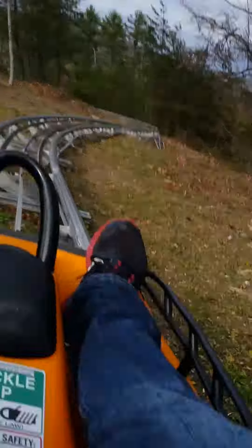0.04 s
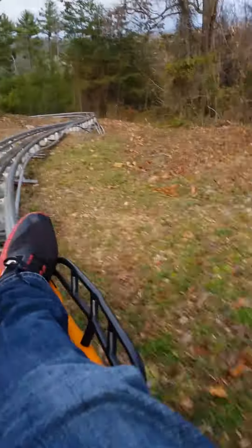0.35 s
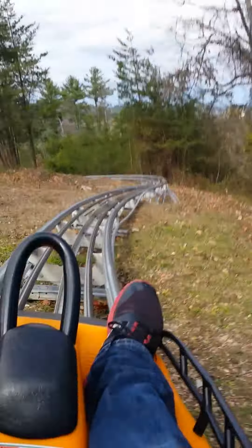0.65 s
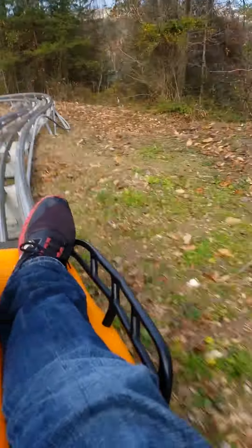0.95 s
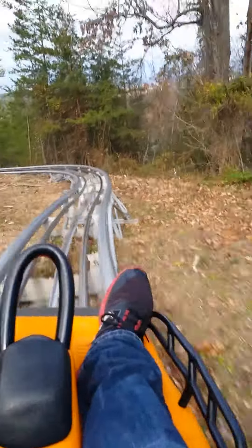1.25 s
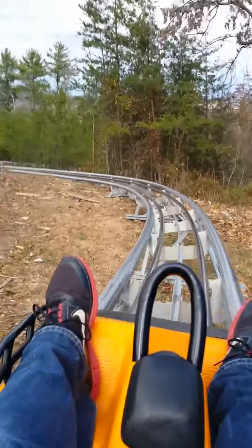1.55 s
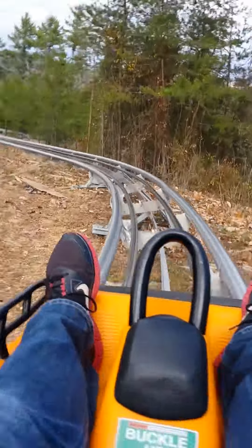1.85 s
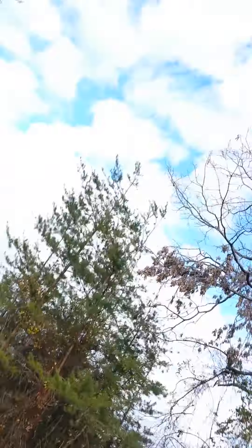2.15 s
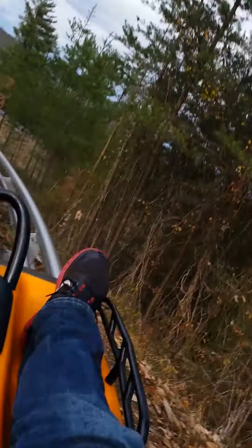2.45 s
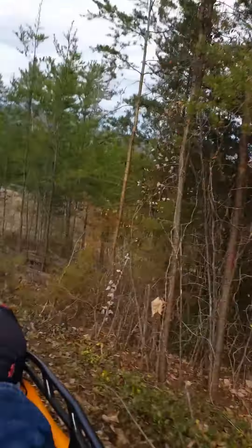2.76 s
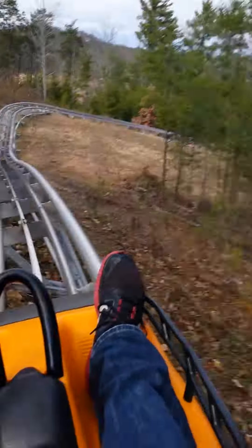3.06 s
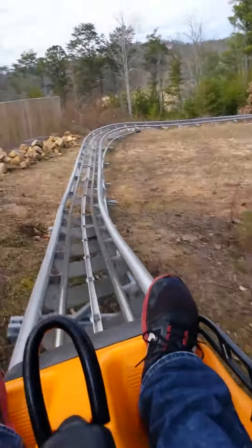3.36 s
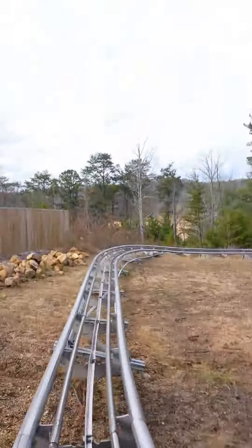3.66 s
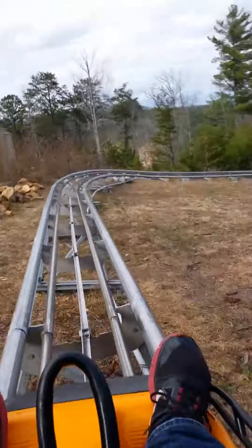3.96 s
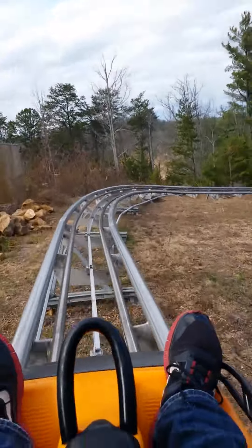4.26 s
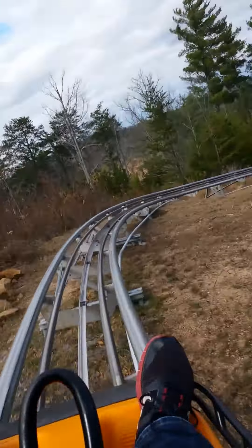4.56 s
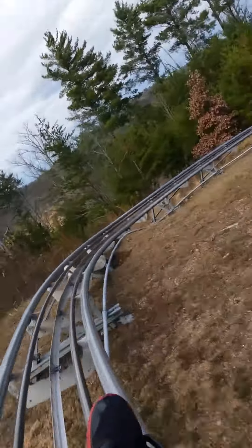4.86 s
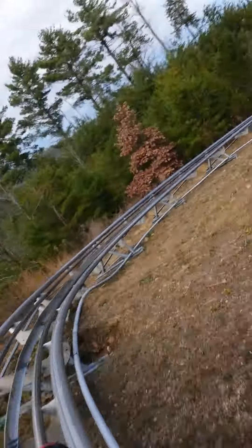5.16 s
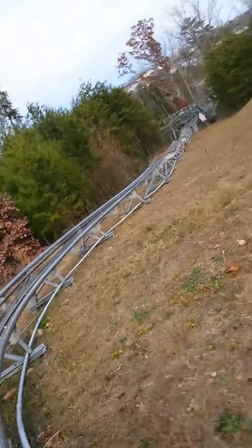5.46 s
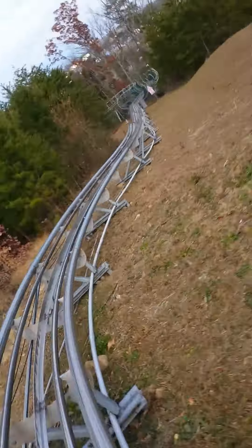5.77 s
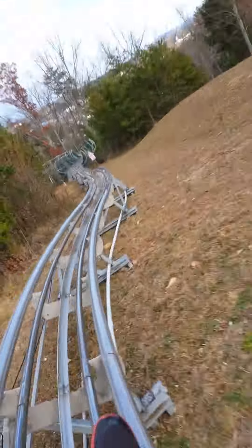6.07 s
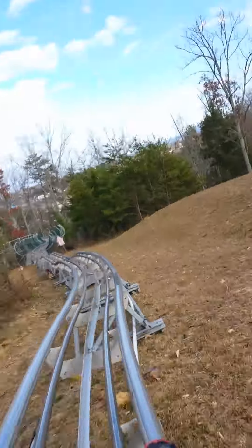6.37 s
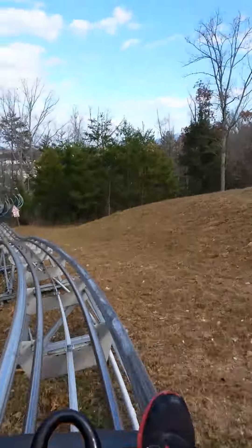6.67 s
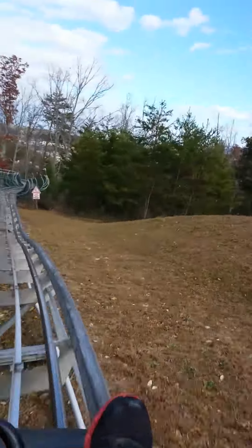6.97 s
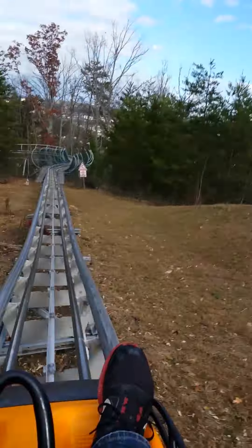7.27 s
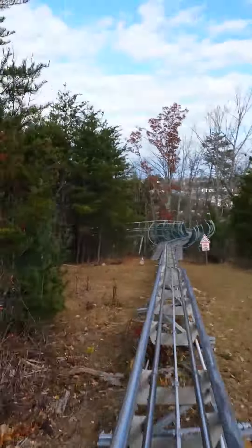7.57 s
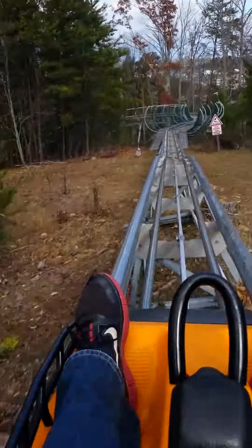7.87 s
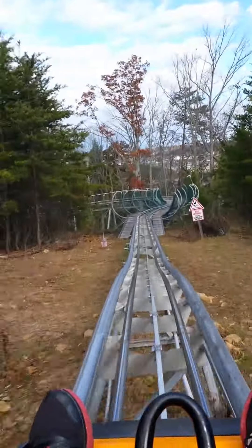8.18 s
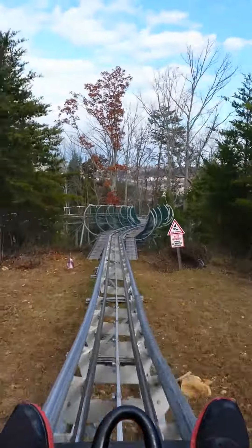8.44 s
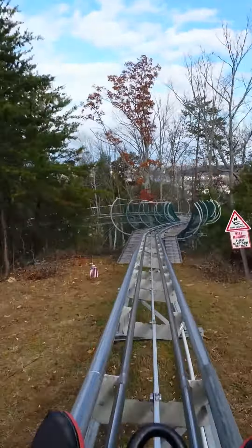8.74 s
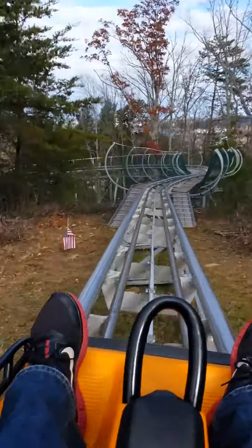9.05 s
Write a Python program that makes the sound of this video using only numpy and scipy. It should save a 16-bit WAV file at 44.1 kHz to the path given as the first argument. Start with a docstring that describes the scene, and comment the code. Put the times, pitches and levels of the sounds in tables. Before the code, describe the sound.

Gusty wind rumbles across the microphone over a rolling cart's wheel hiss, low drumming and ringing clanks on metal track.

```python
"""Coaster cart in a headwind

A cart rolls down tubular steel rails on an open hillside, a stereo microphone in the rider's hand.
Headwind buffets its two ports in turn. Under the roar the wheels hiss on the rails, clank over
the joints and set the hollow shell drumming, with chatter, scuffs and a thin bearing whirr.
The hardest gusts trip a limiter, which ducks the cart."""
import sys
import numpy as np
from scipy import signal
from scipy.fft import rfft, irfft
from scipy.io import wavfile
from scipy.ndimage import uniform_filter1d, map_coordinates

SR = 44100
rng = np.random.default_rng(int(sys.argv[2]) if len(sys.argv) > 2 else 0)


def dump(signal):
    """Clip the signal to [-1, 1] and save it as 16-bit WAV at the path in sys.argv[1]."""
    limited = np.clip(np.atleast_2d(signal).T, -1, 1)
    pcm = np.round(limited * 32767).astype(np.int16)
    wavfile.write(sys.argv[1], SR, pcm)


N = 410571
TIME = np.arange(N) / SR
BINS = np.fft.rfftfreq(N, 1 / SR)


# Gusts that hit one port head-on: start_s, length_s, port (0 left, 1 right), level_db, eddy_hz
HEAD_ON_GUSTS = [(-.01, .07, 0, -7.5, 450), (.075, 0.071, 0, -9, 230), (.145, .085, 1, -13, 344.6),
                 (.212, .022, 0, -13, 300), (.251, .035, 1, -4.5, 400), (.335, .21, 1, -10.5, 389.9),
                 (.998, .072, 1, -11, 380.3), (1.21, .53, 0, -11.5, 360), (1.515, 0.13, 0, -10, 570),
                 (1.778, .022, 1, -11.5, 219.6), (2.055, 0.069, 0, -10.5, 490.4),
                 (2.27, .071, 0, -16, 300.2), (2.45, 0.039, 1, -14.5, 280), (2.559, 0.069, 0, -11, 330),
                 (2.755, .025, 0, -16, 169.8), (2.82, 0.094, 0, -19, 370), (3.36, .16, 0, -23.5, 330.2),
                 (4.13, .09, 0, -8, 150), (4.16, .04, 1, -14, 199.8), (4.761, .08, 1, -13.5, 290),
                 (4.97, .23, 0, -10, 185), (5.27, .03, 0, -5.5, 290), (5.39, .21, 0, -5, 490),
                 (5.505, 0.071, 0, 0.5, 789.4), (5.628, 0.073, 0, -1, 539.8), (5.762, .056, 0, -7.5, 510.5),
                 (7.835, .035, 0, -3, 289.7), (7.96, 0.051, 0, -10.5, 309.7),
                 (8.774, .091, 1, -18.5, 280.4)]

def airflow(headwind, port, steady_hz=238.13, steady_at_db=-15, climb=.08):
    """Level and eddy rate at one port: the steady headwind, taken over by each ragged gust."""
    level_db, = follow(headwind)
    eddy_hz = steady_hz * gain_of(climb * (level_db - steady_at_db))
    ragged_db = flutter(60)
    for start, length, side, gust_db, gust_hz in HEAD_ON_GUSTS:
        if round(side) == port:
            hold = swell(start, length, rise_s=.01 + .17 * length, fall_s=.014 + .1201 * length)
            level_db += hold * (gust_db + ragged_db - level_db)
            eddy_hz += hold * (gust_hz - eddy_hz)
    return level_db, eddy_hz


# Single hard eddies that slap a port: time_s, port (0 left, 1 right), length_s, level_db, eddy_hz
EDDY_SLAPS = [(.006, 0, .01, -4.5, 819), (.186, 1, 0.0049, -7.5, 580.3), (.207, 1, .0025, -9, 1400),
              (.225, 1, .0035, -7, 829), (.258, 1, .009, 1, 800.3), (.33, 1, .003, -6, 619),
              (.359, 1, .005, -9, 718.5), (.374, 1, .003, -2, 779), (.421, 1, .004, -6, 560),
              (.47, 1, .002, -6, 620), (.48, 1, .003, -2, 750), (.507, 1, .003, -10, 1400),
              (.878, 1, 0.0049, -3, 799), (.888, 1, .007, -3.5, 850.5), (.923, 1, .008, -13.5, 479.7),
              (.988, 1, .003, -14.5, 849.8), (1.016, 1, 0.00701, -11.5, 450), (1.043, 1, .008, -15, 560),
              (1.243, 0, .004, -9, 850.1), (1.335, 0, .008, -9, 560), (1.397, 0, .006, -7.5, 600),
              (1.437, 0, .005, -9, 620), (1.545, 0, .018, -8, 739.5), (2.064, 0, .016, -7, 850.6),
              (2.112, 0, .012, -8.5, 520), (2.149, 0, .005, -13.5, 479.8), (2.334, 0, .012, -12.5, 420.4),
              (2.391, 0, 0.0089, -8.5, 640), (2.528, 0, .003, -15.5, 620), (2.593, 0, .002, -8.5, 1100),
              (2.617, 0, .014, -9, 800), (3.886, 0, .012, -6, 440.1), (4.542, 1, 0.0099, -12, 480),
              (5.415, 0, .025, -3.5, 539.8), (5.565, 0, .01, -1, 950.2), (5.675, 0, .03, -2, 740.2),
              (5.774, 0, .016, -8, 700), (6.12, 0, .015, -15.5, 420.2), (6.568, 0, .011, -11.5, 490.3),
              (7.6, 1, .015, -20, 449.7), (7.686, 1, .007, -12.5, 479.8), (7.775, 1, .012, -12, 419.9),
              (7.915, 1, .01, -10, 459.9), (8.0, 1, .01, -9, 560), (8.106, 1, .009, -2, 1700),
              (8.144, 1, .006, -9, 640), (8.458, 1, .008, -15.5, 450), (8.54, 1, .012, -17, 400),
              (8.624, 1, 0.0059, -9, 500), (8.787, 1, .016, -15, 500.1), (8.857, 1, .008, -15, 520.4),
              (8.919, 1, .012, -14, 440), (8.964, 1, .005, -15, 1800), (9.035, 1, .012, -15, 339.7),
              (9.15, 1, .0035, -11.5, 1550)]

def buffeting(headwind, port, gusty_db, surge_db):
    """Pressure and eddy rate at one port, shaken by turbulence and sudden slaps."""
    level_db, eddy_hz = airflow(headwind, port)
    turbulence = flutter(45.04)
    pressure = gain_of(level_db) * unit_rms(gain_of(gusty_db * turbulence))
    eddy_hz = eddy_hz * gain_of(surge_db * (turbulence + .8 * flutter(219.5) - .246))
    for time, side, length, slap_db, slap_hz in EDDY_SLAPS:
        if round(side) == port:
            near = slice(max(round((time - 2 * length) * SR), 0), round((time + 2 * length) * SR))
            hold = np.exp(-((TIME[near] - time) / (.65 * length)) ** 2)
            pressure[near] += hold * (gain_of(slap_db) - pressure[near])
            eddy_hz[near] += hold * (slap_hz - eddy_hz[near])
    return pressure, eddy_hz


def roar(pressure, eddy_hz, steepness, low_hz, top_hz, crackle_db, snaps_per_s, headroom_db, cavity_db):
    """A frozen field of eddies sweeps past a port: the faster the air, the higher and harsher it is."""
    grid = 64  # field samples per eddy
    fineness = BINS / SR * grid  # smaller eddies carry steeply less pressure
    field = unit_rms(filtered(rng.standard_normal(N), 1 / np.sqrt(1 + fineness ** steepness)))
    position = np.cumsum(eddy_hz) / SR * grid % (N - 1)
    swept = map_coordinates(field, [position], order=3, mode="nearest")
    ceiling = gain_of(headroom_db)  # the hardest buffets overload the membrane, which adds rasp
    rasping = ceiling * np.tanh(swept * pressure / ceiling)
    snaps = gain_of(crackle_db) * crackle(pressure, eddy_hz, snaps_per_s)
    port_band = 1 / np.sqrt((1 + (low_hz / (BINS + 1)) ** 4) * (1 + (BINS / top_hz) ** 24))
    lift_db = 1 + 1.5 * resonance(100, 83) + cavity_db * resonance(980, 700)  # bass hump, port cavity
    return filtered(rasping + snaps, port_band * gain_of(lift_db))


def crackle(pressure, eddy_hz, snaps_per_s, low_hz=950, bright_hz=1500):
    """Fast eddies tear off the port's edge with dry snaps; slow air makes few and faint ones."""
    speed = eddy_hz / 500
    snaps = (rng.random(N) < snaps_per_s * speed ** 2 / SR) * rng.standard_normal(N)
    snaps = snaps * pressure * np.minimum(speed, 1) ** 2 * gain_of(5)
    band = BINS ** 2 / np.hypot(BINS ** 2, low_hz ** 2) / np.hypot(1, (BINS / bright_hz) ** 2)
    return filtered(snaps, 2 * band)


# Steady headwind on the left port: time_s, level_db
HEADWIND_LEFT = [(0, -12), (.13, -12), (.19, -17), (.3, -26), (.52, -22), (.63, -22), (.69, -12),
                 (.85, -17), (.93, -20), (1.07, -24), (1.17, -13), (1.95, -15.5), (2.17, -16), (2.24, -26),
                 (2.33, -19), (2.47, -27), (2.55, -17), (2.7, -17.5), (3.2, -26), (3.55, -21), (3.8, -12.5),
                 (4.5, -14), (5.25, -13), (5.72, -15), (6.1, -17), (6.7, -12), (7.8, -11.5), (8.3, -16.5),
                 (9.31, -18)]
# Steady headwind on the right port, mostly in the lee: time_s, level_db
HEADWIND_RIGHT = [(0, -31), (.6, -18), (.74, -19), (.79, -27), (.85, -22), (1.09, -23), (1.15, -17),
                  (1.3, -24), (1.45, -37), (2, -27), (2.4, -23), (2.6, -32), (2.87, -26), (3.1, -40),
                  (3.7, -29), (4, -22), (4.7, -20), (5.1, -26), (5.9, -26), (6.5, -35), (6.85, -23),
                  (7.5, -28), (7.85, -19), (8.3, -22), (9.31, -20)]

def wind():
    """Each microphone port roars with its own turbulent air."""
    left = roar(*buffeting(HEADWIND_LEFT, port=0, gusty_db=1.03, surge_db=.65),
                steepness=4.335, low_hz=92, top_hz=7350,
                crackle_db=3, snaps_per_s=700, headroom_db=3.5, cavity_db=1.5)
    right = roar(*buffeting(HEADWIND_RIGHT, port=1, gusty_db=2.1, surge_db=1.23),
                 steepness=4.18, low_hz=72, top_hz=9940,
                 crackle_db=1, snaps_per_s=900, headroom_db=8, cavity_db=.3)
    return left, right


# Loudness of the wheel hiss as it swells and dips: time_s, level_db
WHEEL_HISS_LEVEL = [(0, -50), (.3, -60), (.5, -59), (.6, -47), (.85, -50), (1.72, -57), (1.82, -46),
                    (2.2, -50), (2.87, -41), (3.05, -48), (3.27, -49), (3.5, -39), (3.57, -43.5),
                    (3.97, -37), (4.15, -44.5), (4.3, -38.5), (4.7, -39), (4.87, -33), (5, -38.5),
                    (5.3, -41), (5.95, -48), (6.81, -49), (6.84, -37.5), (6.96, -35), (7.25, -37.5),
                    (8.13, -45), (8.8, -45), (9.31, -51.5)]
# The hiss pans as the rider's hand swings: time_s, left_minus_right_db
HISS_PAN = [(0, -2), (.5, -4), (1.3, -1), (2.4, 4.5), (3.2, -2), (3.6, 3), (8.8, 4), (9.3, -1)]

def wheels(grit_per_s=260, sizzle_hz=9200, sizzle_climb=.42, sizzle_from_db=-43):
    """Wheels roll on the rail: a gritty hiss, brighter when louder, and a faint steel ring."""
    hiss_db, = follow(WHEEL_HISS_LEVEL)
    pan_db, = follow(HISS_PAN)
    grit = (rng.random(N) < grit_per_s / SR) * rng.standard_normal(N)
    contact = noise_pair(.25) + .14 * unit_rms(grit)
    contact = contact * gain_of(hiss_db + 1 + 1.64 * flutter(40)) * pan(pan_db)
    hiss = wavering(wheel_colour(contact))
    treble = filtered(hiss, 1 - 1 / (1 + (BINS / sizzle_hz) ** 10))
    sizzle = treble * (gain_of(sizzle_climb * (hiss_db - sizzle_from_db)) - 1)
    return hiss + sizzle + gain_of(-24) * steel_ring(contact)


# Tone of the wheel noise at each port: frequency_hz, left_db, right_db
WHEEL_TONE = [(1270, 5, 8), (1640, 7.5, 0), (2060, 1.5, 3.5), (3020, 3, -1), (3430, 1, -1), (4020, 7, 0),
              (5160, 8, 3.5), (6020, 8, -5), (6550, 3, 5.5), (7450, 1.5, 6.5), (8070, -2.5, 6),
              (9260, -7, -1.5), (11140, -15, -6), (14800, -40, -37)]
# Hollow resonances of the rail tube and wheel housings: pitch_hz, width_hz, lift_db
TUBE_RESONANCES = [(1470, 140, 5.5), (1680, 126, 7), (3150, 210, 0.5), (3800, 130, 2), (4220, 200, 4.5),
                   (5800, 240, 0.5), (8000, 240, 2.5), (10750, 300, 1)]

def wheel_colour(x, low_hz=450):
    """Rail tube and housings make the wheel noise hollow, with little bass."""
    hz, *ports_db = np.transpose(WHEEL_TONE)
    hollow_db = sum(db * resonance(centre, width) for centre, width, db in TUBE_RESONANCES)
    tone = np.array([colour(hz, db) for db in ports_db])
    bass_cut = BINS / np.hypot(BINS, low_hz)
    return filtered(x, unit_rms(tone * gain_of(hollow_db) * bass_cut))


def wavering(hiss, depth_db=2.15):
    """The colour of a hiss drifts: narrow bands come and go."""
    spectra = signal.stft(hiss, nperseg=512)[2]
    bands = uniform_filter1d(rng.standard_normal(spectra.shape), size=3, axis=1)
    patches = unit_rms(uniform_filter1d(bands, size=32, axis=2))
    return signal.istft(spectra * gain_of(depth_db * patches))[1][:, :N]


# Ringing modes of the steel rail and wheel carriers: pitch_hz, level_db, t60_s
STEEL_MODES = [(1700, -5, .1), (2620, -5.5, 0.12), (2880, -7, 0.17), (3260, -8, 0.16), (3885, -4.5, 0.17),
               (4500, -10, .08), (5400, -1, .12), (5790, 0, .14), (6027, -1, .12), (6605, -3, .11),
               (7340, 3, 0.13), (7803, -6, .1), (8300, -6, 0.12), (8610, -3, .12), (10850, -13, .09),
               (11500, -14, .11), (12060, -18, .08), (13225, -19, .11)]

def steel_ring(contact):
    """Rolling contact keeps the steel's modes ringing."""
    age = TIME[:SR // 4]
    phases = rng.uniform(0, 2 * np.pi, (len(STEEL_MODES), 2, 1))
    ring = sum(gain_of(db - 60 * age / t60) * np.sin(2 * np.pi * hz * age + phase)
               for (hz, db, t60), phase in zip(STEEL_MODES, phases))
    return signal.oaconvolve(contact, ring / np.linalg.norm(ring[0]), axes=1)[:, :N]


# Wheels striking rail joints:
# time_s, level_db, rise_s, rattle_t60_s, left_minus_right_db, ring_offset_db, ring_tilt_db_per_octave
JOINT_HITS = [(3.519, -38, 0.0078, .1, 7, -3, 0), (3.749, -42, 0.0079, .1, 5, -3, -3),
              (3.798, -36, .01, .1, 5, -2, -2), (3.932, -34.5, .012, .3, 10.5, 3, -11),
              (4.059, -32, .004, .11, 0, -3, 2), (4.271, -24.5, .002, .085, 4, -6, -1),
              (4.332, -17, .002, .075, -3, -3.5, 7), (4.45, -35, 0.0039, .1, 2, -5, 3),
              (4.571, -36, .008, .14, 0, -1, 1), (4.635, -38, 0.0082, .1, 2, -2, -4),
              (4.752, -31, .012, .28, 6, 3, -9), (4.828, -24, .003, .12, 2, 0, -0.5),
              (4.928, -28, .012, .14, 2, -2, -2), (5.165, -25, .006, .1, 4, 0, 1),
              (5.177, -22.5, .002, .11, 2, -1, 1), (5.229, -33, 0.0061, .13, 8.5, -2, -5),
              (6.825, -28.5, .005, .14, 6.5, -2, -8), (6.876, -37, 0.0081, 0.098, 6, 1, -12),
              (6.909, -28.5, .003, .09, 5, -2.5, 1), (6.936, -32, .006, .1, 5, -3, 0),
              (7.012, -27.5, .004, .11, 5, -1.5, -1), (7.417, -39, 0.0059, 0.099, 7, -3, -2),
              (7.48, -36.5, .01, .26, 3, -8, 4), (7.599, -40, 0.0052, .1, 4, -5, 4)]

def joints(rattle_db=-2, ring_db=1, spot_db=4, pivot_hz=6000, detune=.006):
    """Each joint sets off a short rattle and rings the steel; the spot struck picks the modes."""
    age = TIME[:SR // 5]
    hz, mode_db, mode_t60 = np.transpose(STEEL_MODES)
    decay = gain_of(-60 * age / mode_t60[:, None])
    force, ring = np.zeros((2, 2, N))
    for time, db, rise, t60, balance_db, offset_db, tilt in JOINT_HITS:
        blow = pan(balance_db) * gain_of(db) * np.minimum(age / rise, 1)
        spot, phase, shift = rng.standard_normal((3, 2, len(hz)))
        pitch_hz = hz * (1 + detune * shift[0])  # no two joints ring alike
        modes = decay * np.exp(2j * np.pi * pitch_hz[:, None] * age)
        weights = gain_of(mode_db + tilt * np.log2(hz / pivot_hz) + spot_db * spot)
        weights = 2 * weights / np.linalg.norm(weights) * np.exp(2j * np.pi * phase)
        add(force, time - rise / 2, blow * gain_of(-60 * np.maximum(age - rise / 2, 0) / t60))
        add(ring, time - rise / 2, blow * gain_of(offset_db) * (weights @ modes).real)
    return gain_of(rattle_db) * bright_rasp(force) + gain_of(ring_db) * ring


def bright_rasp(force, flutter_db=3):
    """Bright, fluttering contact noise, as loud as the force behind it."""
    rattle = force * noise_pair(.45) * gain_of(flutter_db * flutter(160))
    brightness = colour(hz=[1000, 4000, 7000, 10000, 14500], db=[.59, 3.6, 6.5, 4, 15])
    return filtered(wheel_colour(rattle), brightness)


# Boomy tone of the cart's shell: frequency_hz, level_db
SHELL_TONE = [(20, -31), (50, -15), (85, -6.5), (112, 7.5), (150, -10), (240, -9.5), (420, -12.5),
              (650, -18), (900, -24), (2000, -62.5), (5000, -97)]

def shell_drumming(level_db=-30.5, hiss_share=.3, balance_db=1.5):
    """The cart's hollow shell drums, swelling a little with the wheel hiss."""
    hiss_db, = follow(WHEEL_HISS_LEVEL)
    swell_db = hiss_share * (hiss_db - hiss_db.mean())
    drum = unit_rms(filtered(noise_pair(.42), colour(*np.transpose(SHELL_TONE))))
    return drum * gain_of(level_db + swell_db + 1.6 * flutter(12)) * pan(balance_db)


# Wheel load through the long bend and two kinks in it: start_s, length_s, level_db
BEND_LOADS = [(3.72, 1.62, -22.5), (4.13, .07, -18.5), (5.03, 0.11, -22)]
# Low modes of the shell: pitch_hz, width_hz, level_db
DRONE_MODES = [(111, 27, 0), (138, 36, -1.5), (174.5, 35, 0), (234, 58, -7)]

def bend_drone(balance_db=6):
    """Pressed into the bend, the wheels drive the shell's low modes into a throbbing drone."""
    load = strokes(BEND_LOADS, rise_s=.1, fall_s=.08)
    return resonant_noise(DRONE_MODES, shared=.44) * load * pan(balance_db)


# Runs of chatter on uneven rail: start_s, length_s, level_db
CHATTER_RUNS = [(2.63, .3, -45), (3.36, .45, -45), (3.93, 0.091, -37), (4.21, .07, -37.5),
                (4.49, .045, -39), (4.75, .11, -35), (6.825, 0.069, -33), (7.7, .45, -42), (8.2, 0.56, -45)]
# Hollow resonances of the chassis: pitch_hz, width_hz, level_db
CHASSIS_MODES = [(1000, 220, -7), (1280, 150, -4), (1500, 130, -2), (1720, 120, 2), (2450, 300, -11)]

def chatter(knocks_per_s=140, balance_db=5):
    """Loose parts knock in quick, uneven runs and sound the hollow chassis."""
    knocks = (rng.random(N) < knocks_per_s / SR) * np.sign(noise_pair(.4))
    body = sum(gain_of(db) / (1 + 2j * (BINS - hz) / width) for hz, width, db in CHASSIS_MODES)
    body = body * colour(hz=[300, 900, 2600, 5000], db=[-20, 1, -1, -20])
    ringing = unit_rms(filtered(unit_rms(knocks) + .5 * noise_pair(.4), body))
    return ringing * strokes(CHATTER_RUNS, rise_s=.015, fall_s=.036) * pan(balance_db)


# Bright scuffs: start_s, length_s, level_db, left_minus_right_db
BRIGHT_SCUFFS = [(0.581, .028, -38, -3), (0.625, .028, -43.5, -12), (.79, 0.059, -48.5, 2),
                 (1.792, 0.039, -40, 7.5), (1.882, 0.027, -37.5, -2.5), (2.259, 0.068, -49, 10),
                 (2.423, .052, -33.5, 7), (2.86, 0.039, -48, 11), (3.44, .06, -49, 11),
                 (5.581, 0.036, -34, 10), (5.832, 0.056, -42.5, 5)]

def scuffs(trim_db=1.5):
    """Brief, bright rubbing noises that swell and fade without a ring."""
    force = sum(pan(balance_db) * gain_of(db) * swell(start, length, rise_s=.016, fall_s=.032)
                for start, length, db, balance_db in BRIGHT_SCUFFS)
    return gain_of(trim_db) * bright_rasp(force, flutter_db=2.5)


# Soft scrapes along the cart: start_s, length_s, level_db
SCRAPE_STROKES = [(.58, .035, -29), (.68, 0.24, -41.5), (.92, 0.29, -51)]
# Resonances that colour them: pitch_hz, width_hz, level_db
SCRAPE_RESONANCES = [(1359, 377, 1), (1800, 176, 6), (4550, 450, 0), (5050, 700, -8), (6800, 550, -12),
                     (10074, 1000, -18)]

def scrape(balance_db=8):
    """Uneven friction sounds through a few broad resonances."""
    force = strokes(SCRAPE_STROKES, rise_s=.022, fall_s=.051)
    friction = resonant_noise(SCRAPE_RESONANCES, shared=.16)
    return friction * force * gain_of(2 * flutter(90)) * pan(balance_db)


# Thin, steady whirr of the wheel bearings: pitch_hz, width_hz, level_db
BEARING_MODES = [(1700, 120, 6), (4260, 200, 3.5), (5500, 250, -5), (6690, 210, 3), (8150, 220, -6),
                 (9300, 260, -7)]

def bearings(level_db=-59):
    """The bearings whirr through narrow resonances, heard wherever the hiss dips."""
    return resonant_noise(BEARING_MODES, shared=.4) * gain_of(level_db + 1.5 * flutter(12))


def gain_of(db):
    """Decibels to amplitude."""
    return 10 ** (np.asarray(db) / 20)


def unit_rms(x):
    """Scales to an rms of 1."""
    return x / np.sqrt(np.mean(x ** 2) + 1e-20)


def follow(rows):
    """The columns of a timed curve at every sample."""
    times, *columns = np.transpose(rows)
    return [np.interp(TIME, times, column) for column in columns]


def filtered(x, gain):
    """Applies one gain for each frequency bin."""
    return irfft(rfft(x) * gain, N)


def colour(hz, db):
    """An EQ curve through a few points."""
    return gain_of(np.interp(np.log(BINS + 1), np.log(hz), db))


def resonance(hz, width_hz):
    """The curve of one resonance, 1 at its centre."""
    return 1 / (1 + (2 * (BINS - hz) / width_hz) ** 2)


def flutter(rate_hz):
    """Smooth random motion of rms 1, up to the given rate."""
    return unit_rms(filtered(rng.standard_normal(N), 1 / (1 + (BINS / rate_hz) ** 4)))


def pan(balance_db):
    """Left and right gains for a left-minus-right level."""
    return gain_of(np.array([[.5], [-.5]]) * balance_db)


def noise_pair(shared):
    """White noise for two ports, with a fraction of its power shared."""
    return np.sqrt(shared) * rng.standard_normal(N) + np.sqrt(1 - shared) * rng.standard_normal((2, N))


def resonant_noise(modes, shared):
    """Stereo noise through a bank of resonances, at an rms of 1."""
    body = sum(gain_of(db) * resonance(hz, width) for hz, width, db in modes)
    return unit_rms(filtered(noise_pair(shared), body))


def swell(start_s, length_s, rise_s, fall_s):
    """Rises around the start, holds at up to 1, and falls around the end."""
    return np.clip(np.minimum((TIME - start_s) / rise_s, (start_s + length_s - TIME) / fall_s) + .5, 0, 1)


def strokes(rows, rise_s, fall_s):
    """The summed envelope of a few swells."""
    return sum(gain_of(db) * swell(start, length, rise_s, fall_s) for start, length, db in rows)


def add(mix, start_s, sound):
    """Mixes a stereo sound in at a time."""
    part = mix[:, round(start_s * SR):][:, :sound.shape[1]]
    part += sound[:, :part.shape[1]]


def limiter(x, thresholds_db=(-13.5, -15.5), ratio=3.8, recover_db_per_s=201, lag_s=.0037, sense_hz=260):
    """A hard gust on either port turns both down, so the cart ducks; deep bass counts less."""
    sidechain = filtered(x, BINS ** 2 / np.hypot(BINS ** 2, sense_hz ** 2))
    power_db = 10 * np.log10(abs(uniform_filter1d(sidechain ** 2, size=900)) + 1e-12)
    over_db = np.maximum((power_db - np.array(thresholds_db)[:, None]).max(axis=0), 0)
    recovery = recover_db_per_s * TIME
    held_db = uniform_filter1d(np.maximum.accumulate(over_db + recovery) - recovery, size=300)
    late_db = np.interp(TIME - lag_s, TIME, held_db)  # lets the first instant of a slap through
    return x / gain_of((1 - 1 / ratio) * late_db)


def scene():
    """Each port has its own wind; the cart reaches both, the right a moment later."""
    left, right = wind()
    cart = (wheels() + bearings() + shell_drumming() + bend_drone()
            + joints() + chatter() + scuffs() + scrape())
    lag_samples = 14
    return np.array([left + cart[0], right + np.pad(cart[1], (lag_samples, 0))[:N]])


def record(dry):
    """The limiter, peaks rounded off near full scale, 3 ms fades at the ends, then a low-pass."""
    held = limiter(dry)
    rounded = held / (1 + held ** 12) ** (1 / 12)
    fades = np.minimum(np.minimum(TIME, TIME[::-1]) / .003, 1)
    lowpass = signal.firwin(511, cutoff=15200, window=("kaiser", 9), fs=SR)
    return signal.oaconvolve(rounded * fades, lowpass[None], "same")


dry = scene()
out = record(dry)
dump(out)
```